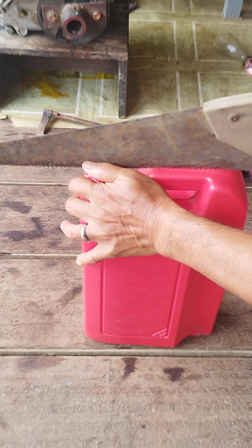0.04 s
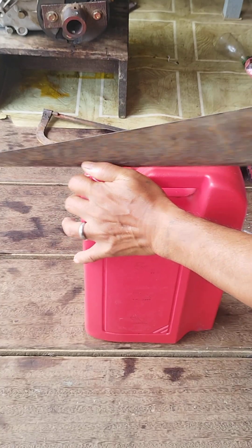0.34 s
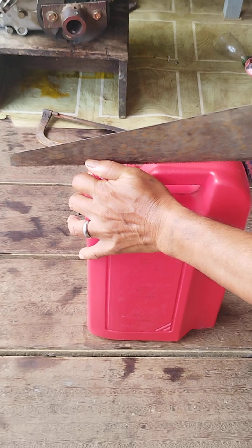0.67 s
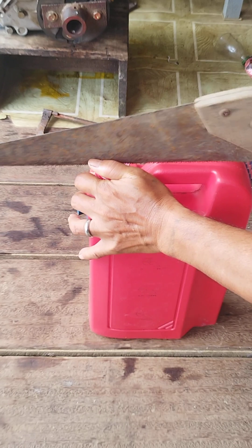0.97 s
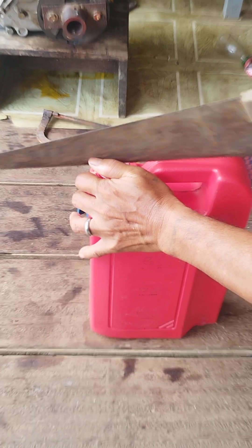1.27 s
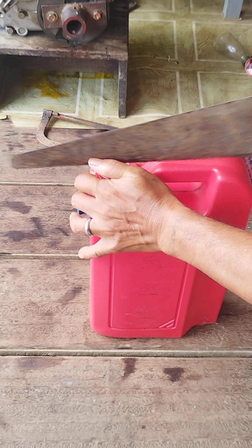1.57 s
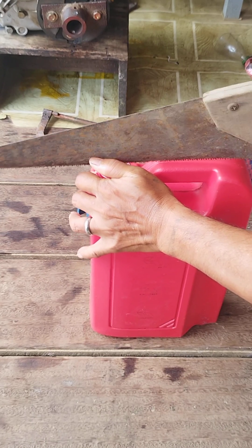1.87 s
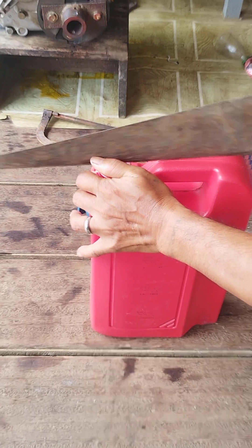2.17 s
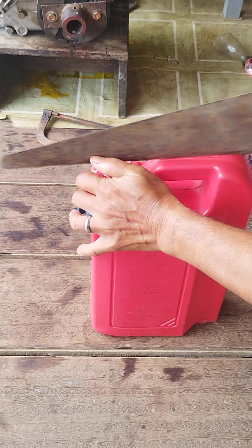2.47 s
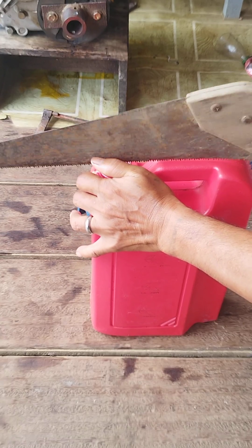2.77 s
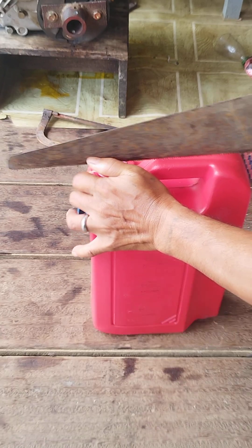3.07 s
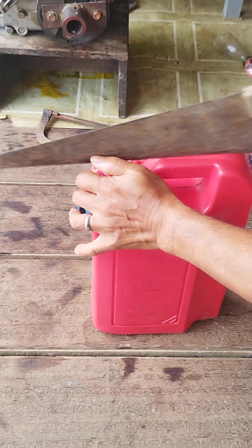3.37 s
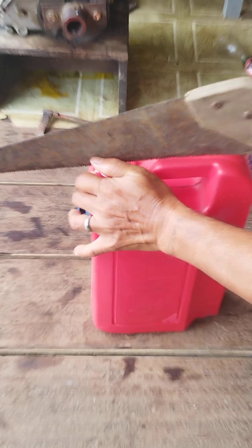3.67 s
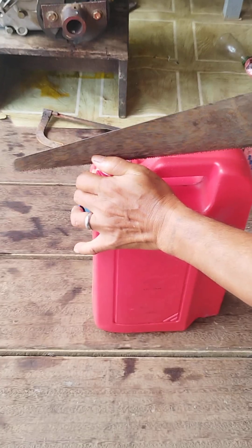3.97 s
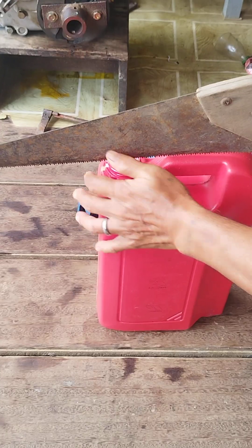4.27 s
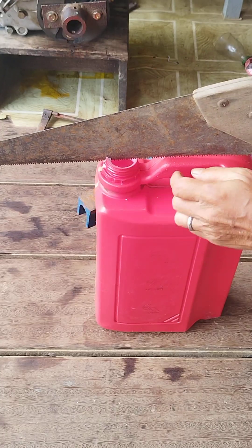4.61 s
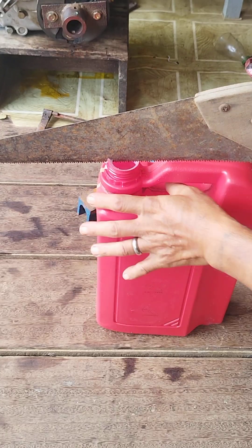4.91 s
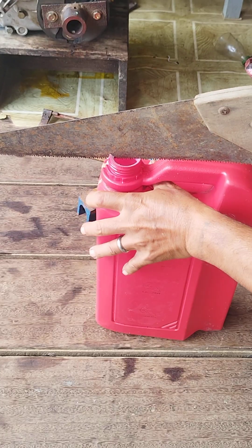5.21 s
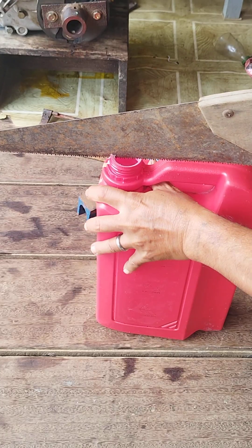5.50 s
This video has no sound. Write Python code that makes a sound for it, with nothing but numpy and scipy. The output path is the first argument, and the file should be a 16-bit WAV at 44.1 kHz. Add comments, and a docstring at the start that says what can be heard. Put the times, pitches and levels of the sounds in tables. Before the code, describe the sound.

Close by in a small, fairly dry room, a hand saw works rapidly through a plastic container, four or five strokes a second. The gritty rasp and steel hiss ride on the hollow drumming of the container, with scattered knocks as the teeth snag. The saw stops after a sharper snag, leaving a faint low hum. A hand then brushes and lightly pats the container.

```python
"""A hand saw cuts into the top of a hollow plastic can on a wooden bench, in nineteen quick strokes.
Each tooth is an impact that drives the can's walls into resonance; tearing chips excite the stiffer
plastic at the cut and make the steel blade hiss, while the air in the can booms and the bench rumbles.
The saw stops, a hand pats the can, and a low hum and a faint high shimmer remain."""
import sys
import numpy as np
from scipy import signal
from scipy.fft import rfft, irfft
from scipy.io import wavfile
from scipy.ndimage import uniform_filter1d, minimum_filter1d

SR = 44100
rng = np.random.default_rng(int(sys.argv[2]) if len(sys.argv) > 2 else 0)


def digitize_waveform(pressure):
    """Quantize a signal to 16-bit integers and store it at the path in sys.argv[1].

    Rows of a 2-D input are taken as channels; values are limited to [-1, 1].
    """
    field = np.atleast_2d(pressure).T
    bounded = np.clip(field, -1, 1)
    quanta = np.round(bounded * 32767).astype(np.int16)
    wavfile.write(sys.argv[1], SR, quanta)


N = 249165
TIME = np.arange(N) / SR
RING_TIME = np.arange(SR // 3) / SR
STOP_S, STOP_DB_PER_S = 4.29, 93  # the saw comes to rest and its sound decays

# Push and pull in turn. Each row: start, attack and time until slackening in seconds; relative levels
# of wall drumming, rasp, blade hiss and cavity boom in dB; peak tooth rate in Hz.
STROKES = [(-0.043, 0.033, 0.05, -12.0, -23, -36, 1, 291.5),
           (0.158, 0.05, 0.076, -9, -21.5, -33.5, -3.0, 345.8),
           (0.391, 0.035, 0.064, -13, -26.5, -40, -1.5, 275.6),
           (0.59, 0.025, 0.11, -13.5, -30.5, -47, -2, 286.5),
           (0.843, 0.032, 0.055, -11, -21.5, -35.5, 7, 329),
           (1.052, 0.02, 0.095, -12.5, -28, -43.5, -5.5, 295.4),
           (1.289, 0.039, 0.085, -12, -22.5, -35.5, -1, 324.6),
           (1.494, 0.02, 0.13, -16.0, -29.5, -43.0, -0.5, 295.1),
           (1.759, 0.016, 0.063, -14.5, -25.5, -36.5, -2, 298.6),
           (1.956, 0.022, 0.12, -18, -30.5, -43.0, -1.5, 293.9),
           (2.212, 0.018, 0.082, -16.5, -27, -38.5, -0.5, 295.5),
           (2.426, 0.063, 0.12, -14, -25.5, -39.5, -2.5, 279.8),
           (2.668, 0.0087, 0.093, -22.5, -30, -39.0, 5.0, 289.3),
           (2.882, 0.12, 0.11, -6.5, -21.5, -34.5, -0.5, 298.6),
           (3.135, 0.023, 0.073, -15, -23.5, -37, 5, 291.2),
           (3.352, 0.033, 0.11, -12.0, -25, -38, -2, 307.9),
           (3.606, 0.015, 0.079, -17.5, -26, -38.0, 4.5, 308.4),
           (3.816, 0.024, 0.11, -14, -25.5, -38.5, -1.5, 284.3),
           (4.057, 0.012, 0.072, -18, -25, -36.5, 4.5, 304.2)]
# Resonant modes. Each row: frequency in Hz, bandwidth in Hz, relative level in dB.
WALL_MODES = [(237.7, 4.9, 3), (266.6, 52, -2), (295, 5.8, -2), (329, 6.9, -4), (355.3, 9.9, -4),
              (406.3, 9, -10.5), (454.5, 23, -8)]  # broad flexing of the can's walls
CUT_MODES = [(629.3, 29.5, 14.5), (650, 49, 10), (726, 48, 5.5), (783, 87, 3), (829.6, 17, 11),
             (847, 20, 6.5), (993, 48, 2), (1084, 7.3, -5.5), (1117, 64, 10.5), (1185, 116, -1),
             (1304, 22, 5), (1332, 36, 5.5), (1374, 15, 2.5), (1572, 23, 1), (1638, 13, 8), (1750, 9.3, -1),
             (1930, 18, -36), (2120, 20, 3.5), (2360, 61, -45), (2450, 17, 0.5), (2920, 290, -25)]  # stiffer plastic around the cut
CAVITY_MODES = [(120, 29, -14.5), (143, 33, -13), (158.7, 20, 4.5)]  # the air in the can
BENCH_MODES = [(74, 18, 0)]  # the bench top
PATTED_MODES = [(337, 8.8, -7.5), (372, 14, -9.5), (430, 16, -11.5), (580, 25, -27), (620, 18, -4.5),
                (1130, 170, -38)]  # the can under a flat hand
# Steel teeth in the cut. Each row: frequency in Hz, relative spectral density in dB.
BLADE_SPECTRUM = [(500, -46), (1500, 13.5), (2600, 1.5), (3400, -3), (4200, -1.5), (5600, -4), (6600, -2.5),
                  (7400, 3.5), (8100, 0), (9300, -3.5), (10700, -2.5), (12000, -8.5), (14000, -13.5),
                  (15700, -22.5)]
# The blade's stereo balance. Each row: frequency in Hz, left minus right in dB.
BLADE_BALANCE = [(2500, 0.5), (4200, -1.5), (6000, -1), (7200, -2.5), (8500, -1.5), (10500, 13),
                 (14000, 2.5)]
# The teeth grab and the wall bucks. Each row: start in seconds, gain on the drumming in dB.
GRABS = [(0.429, 7), (.630, 0), (0.879, 4.5), (1.548, 4), (2.050, 6), (2.545, 3.5), (2.696, 13.5),
         (3.161, 6), (3.257, 8), (3.640, 7), (3.942, 4)]
# A tooth snaps free. Each row: start in seconds, blade click in dB, plastic knock in dB.
SNAGS = [(0.401, -27, -21), (.609, -27, -17.5), (0.847, -30, -38), (.959, -21.5, -26), (1.064, -25, -11.5),
         (1.310, -45, -22), (1.443, -24, -16.5), (1.771, -41, -45), (1.984, -33, -14), (2.187, -26, -29),
         (2.233, -20, -19), (2.439, -48, -24), (2.506, -28, -15.5), (2.678, -33, -40), (2.743, -40, -35),
         (2.773, -27, -38), (3.088, -45, -23), (3.14, -39, -18), (3.183, -26, -10), (3.4, -17.5, -9),
         (3.428, -21, -15), (3.62, -22, -28), (3.825, -28, -21), (4.071, -38, -39), (4.080, -9.5, -9),
         (4.094, -22, -8), (4.368, -27.5, -26.5)]
# The blade squeaks as it turns. Each row: start in seconds, length in seconds, pitch in Hz, level in dB.
SQUEAKS = [(1.714, 0.05, 3110, -50), (3.074, .04, 994, -36.5)]
# The bench's rumble. Each row: time in seconds, level in dB.
BENCH_LEVELS = [(0, -42), (1, -42.5), (2.2, -47), (3.1, -42.5), (3.7, -39.5), (4.2, -41), (4.55, -56)]
# The hand lands on the can. Each row: start in seconds, peak level in dB.
PATS = [(4.951, -31), (4.970, -23), (5.027, -36)]
# Fingers on plastic. Each row: start in seconds, length in seconds, dull rub in dB, dry hiss in dB.
BRUSHES = [(4.765, 0.06, -56.5, -56), (4.881, .06, -63, -57.5), (4.935, 0.13, -49.5, -70),
           (5.078, 0.047, -54, -76)]
# Background noises. Each row: frequency in Hz, relative spectral density in dB.
AIR_SPECTRUM = [(13, -36), (22, 8), (56, -12), (80, -32), (121, 3), (177, -7), (382, -16.5), (516, -20),
                (608, -23), (3430, -33.5), (5320, -37), (5770, -42), (6270, -50), (10300, -42),
                (15500, -56)]
SHIMMER_SPECTRUM = [(4500, -37), (5900, 9), (6400, 7), (7600, 11.5), (8200, 5), (9200, -8)]
# Hum tones. Each row: frequency in Hz, level in dB.
HUM_TONES = [(49, -53), (113, -48), (231, -63)]
# The shimmer's swell. Each row: time in seconds, level in dB.
SHIMMER_LEVELS = [(0, -77), (4.85, -65), (5, -61), (5.65, -62.5)]
# An insect-like tone that sags twice. Each row: time in seconds, pitch in Hz.
TRILL_PITCH = [(4.3, 5880), (4.85, 5654), (4.95, 6120), (5.65, 5550)]
# A faint whistle. Each row: time in seconds, pitch in Hz, level in dB.
WHISTLE = [(4.541, 9220, -83), (4.58, 9820, -79), (4.615, 10860, -70), (4.69, 9700, -76),
           (4.76, 10000, -80), (4.83, 10500, -73), (4.9, 9600, -84)]
# Likeness of left and right. Each row: frequency in Hz, correlation from 0 to 1.
COHERENCE = [(30, 0.16), (110, 1), (250, 0.82), (700, 0.3), (1500, 0.057), (5000, 0.51), (15000, 0.099)]


def saw():
    """Forced vibration: tooth impacts and torn chips drive the walls, the cut, the blade and the cavity."""
    drum_db, rasp_db, hiss_db = np.transpose(STROKES)[3:6]
    drum = stroke_envelope(drum_db, attack_scale=1.96, release_s=0.072, turn_db=-39)
    rasp = stroke_envelope(rasp_db, attack_scale=1.06, release_s=0.071, turn_db=-50.5)
    hiss = stroke_envelope(hiss_db, attack_scale=0.86, release_s=0.067, turn_db=-60)
    blows, tearing = teeth(arch=.33, jitter=.07, uneven_db=5.0, bite=0.53)
    chips = tearing * np.array([fractures(per_s=2500, spread_db=1.5) for _ in range(2)])
    cracks = fractures(per_s=56, spread_db=2.0)  # now and then a large chip breaks off
    grab = grab_gain()
    return (amp(0.53) * drum * grab * wall_drumming(blows, chips)
            + amp(0.65) * rasp * grab ** 0.42 * cut_rasp(blows, chips, cracks, rasp)
            + amp(4.5) * hiss * blade_hiss(tearing, cracks)
            + amp(-30.5) * cavity_boom(drum * rasp))


def teeth(arch, jitter, uneven_db, bite):
    """An impulse train whose rate follows blade speed: one blow a tooth, then a short spell of tearing."""
    starts, *_, peak_hz = np.transpose(STROKES)
    stroke = np.interp(TIME, np.append(starts, STOP_S), np.arange(len(starts) + 1))
    rate_hz = np.append(peak_hz, 0)[stroke.astype(int)] * abs(np.sin(np.pi * stroke)) ** arch
    unsteadiness = np.maximum(1 + jitter * wander(90), .1)
    teeth_passed = np.cumsum(np.maximum(rate_hz, 60) * unsteadiness) / SR
    tooth = teeth_passed.astype(int)
    depth = amp(uneven_db * np.clip(rng.standard_normal(N), -2, 2))[tooth]
    blows = depth * np.diff(tooth, prepend=0)
    tearing = depth * (0.35 + np.exp(-(teeth_passed % 1) / bite))
    return unit_rms(blows), unit_rms(tearing)


def fractures(per_s, spread_db):
    """Shot noise: tiny fractures of uneven size occur at random instants."""
    size = amp(spread_db * np.minimum(rng.exponential(1, N), 4)) * rng.choice([-1, 1], N)
    return unit_rms(size * (rng.random(N) < per_s / SR))


def stroke_envelope(levels_db, attack_scale, release_s, turn_db):
    """Powers add: each stroke bites, holds and slackens above the light drag of the turning blade."""
    power = amp(turn_db) ** 2
    for (start, attack_s, hold_s, *_), db in zip(STROKES, levels_db):
        age = np.maximum(TIME - start, 0)
        rise = 1 - np.exp(-age / (attack_s * attack_scale))
        fall = np.exp(-(np.maximum(age - hold_s, 0) / release_s) ** 2)
        power = power + (amp(db) * rise * fall) ** 2
    return np.sqrt(power) * amp(-STOP_DB_PER_S * np.maximum(TIME - STOP_S, 0))


def grab_gain(rise_s=0.0019, hold_s=0.028):
    """Transient loading: grabbing teeth raise the vibration at once and soon let go."""
    gain_db = 0
    for start, db in GRABS:
        age = np.maximum(TIME - start, 0)
        gain_db = gain_db + db * (1 - np.exp(-age / rise_s)) * np.exp(-(age / hold_s) ** 4)
    return amp(gain_db)


def wall_drumming(blows, chips):
    """Resonance: the walls respond to blows and chips in their low flexing modes."""
    flexing = convolve(blows + 0.98 * chips[0], modal_ring(WALL_MODES, spread=0.013))
    return steadied(band(flexing, 215.5, 412), 0.052)


def cut_rasp(blows, chips, cracks, envelope):
    """Modal excitation at the cut: a harder stroke tears more sharply and favours the higher modes."""
    force = .5 * blows + chips + 0.91 * chips[::-1] + 0.32 * cracks  # both sides reach each channel
    drive = sliding_blade(force, t60=0.14, wet=0.47, shift_hz=17)
    plastic = band(convolve(drive, modal_ring(CUT_MODES, spread=.2)), 590, 3000)
    treble = signal.sosfiltfilt(signal.butter(2, 1000, "high", fs=SR, output="sos"), plastic)
    treble_gain = (envelope / amp(-12)) ** 0.23
    return steadied(plastic + treble * (treble_gain - 1), 0.02)


def blade_hiss(tearing, cracks):
    """Broadband excitation: fine fractures ring the dense high modes of the steel."""
    grit = tearing * np.array([fractures(per_s=5000, spread_db=3.5) for _ in range(2)])
    steel = coloured(steadied(grit, 0.012) + 0.42 * cracks, BLADE_SPECTRUM, BLADE_BALANCE)
    return unit_rms(sliding_blade(steel, t60=0.099, wet=1.73, shift_hz=19))


def sliding_blade(drive, t60, wet, shift_hz, count=9):
    """A moving boundary: as the blade's free length changes, one set of modes fades into the next."""
    place, out = TIME * shift_hz + 0.27 * wander(5.1), 0
    for k in range(count):
        distance = abs((place - k + count / 2) % count - count / 2)
        share = np.cos(np.pi / 2 * np.minimum(distance, 1))
        out = out + convolve(drive * share, reflections(t60, wet))
    return out


def cavity_boom(effort):
    """Cavity resonance: the air in the can swings more strongly as the sawing grows harder."""
    starts, _, holds, *_, boom_db, _ = np.transpose(STROKES)
    envelope = amp(np.interp(TIME, starts + holds, boom_db)) * effort ** 0.39
    air = convolve(fractures(per_s=1000, spread_db=3.5), modal_ring(CAVITY_MODES))
    return unit_rms(envelope * steadied(band(air, 107.8, 170), 0.2))


def snags(click_t60=0.029):
    """Free vibration after release: a caught tooth lets go, the blade clicks and the plastic knocks."""
    out = np.zeros((2, N))
    knock = band(modal_ring(CUT_MODES, spread=0.14), 710, 2000)
    knock += 1.65 * band(modal_ring(WALL_MODES), 117, 384)
    for start, click_db, knock_db in SNAGS:
        click = coloured(rng.standard_normal((2, len(RING_TIME))), BLADE_SPECTRUM, BLADE_BALANCE)
        click *= np.exp(-np.log(1000) * RING_TIME / click_t60)
        add(out, start, amp(click_db) * click / abs(click).max() + amp(knock_db) * knock)
    return out


def squeaks():
    """Stick-slip friction: the slow blade catches and slides in the cut."""
    return sum(amp(db) * fluttering_tone(hz, flutter=0.0296) * swell(start, length)
               for start, length, hz, db in SQUEAKS)


def bench():
    """Structure-borne sound: the sawing keeps one low mode of the bench top rumbling."""
    rumble = band(convolve(rng.standard_normal(N), modal_ring(BENCH_MODES)), 55, 88)
    return amp(contour(BENCH_LEVELS)) * steadied(rumble, 0.26)


def hand():
    """Soft impact and friction: the palm excites the can's low modes and the fingers brush it."""
    out = np.zeros((2, N))
    pat = band(modal_ring(PATTED_MODES, spread=0.11), 263, 464)
    for start, db in PATS:
        add(out, start, amp(db) * pat / abs(pat).max())
    plastic = convolve(rng.standard_normal(N), modal_ring(CUT_MODES, spread=0.18))
    rub = unit_rms(band(plastic, 426, 4500))
    hiss = unit_rms(band(rng.standard_normal((2, N)), 1450, 13000))
    for start, length, rub_db, hiss_db in BRUSHES:
        out += (amp(rub_db) * rub + amp(hiss_db) * hiss) * swell(start, length)
    return out


def background(air_db=-45.5, trill_db=-74):
    """The noise floor: still air, a wavering hum, an insect-like shimmer and trill, a faint whistle."""
    air = amp(air_db) * unit_rms(coloured(rng.standard_normal((2, N)), AIR_SPECTRUM))
    hum = 0
    for hz, db in HUM_TONES:
        waver = 1 + 0.087 * wander(1.5)
        hum = hum + amp(db) * unit_rms(waver * np.sin(2 * np.pi * hz * TIME + .5 * wander(6.4)))
    shimmer = unit_rms(coloured(rng.standard_normal((2, N)), SHIMMER_SPECTRUM))
    shimmer *= amp(contour(SHIMMER_LEVELS))
    trill = amp(trill_db) * fluttering_tone(contour(TRILL_PITCH), flutter=.016)
    times, hz, db = np.transpose(WHISTLE)
    whistle = fluttering_tone(np.interp(TIME, times, hz), flutter=0.0203)
    whistle *= np.interp(TIME, times, amp(db), left=0, right=0)
    return air + hum + shimmer * (1 + 0.11 * wander(60)) + trill + whistle


def modal_ring(modes, spread=0.):
    """Modal superposition: damped cosines, each with a left-right phase difference set by spread."""
    out = 0
    for k, (hz, width, db) in enumerate(modes):
        phase = (-1) ** k * spread * np.sqrt(hz / modes[0][0]) * np.array([[1], [-1]])
        decay = np.exp(-np.pi * width * RING_TIME)
        out = out + amp(db) * width * decay * np.cos(2 * np.pi * hz * RING_TIME + phase)
    return out / abs(out).max()


def reflections(t60, wet):
    """Reverberation: a direct path and a diffuse stereo tail that falls 60 dB in t60 seconds."""
    response = rng.standard_normal((2, len(RING_TIME))) * np.exp(-np.log(1000) * RING_TIME / t60)
    response *= wet / np.linalg.norm(response, axis=1, keepdims=True)
    response[:, 0] += 1
    return response / np.sqrt(1 + wet ** 2)


def coloured(pair, spectrum, balance=((1, 0), (2, 0))):
    """Partial coherence: two signals are blended, then given a spectrum and a stereo balance."""
    hz = np.fft.rfftfreq(pair.shape[1], 1 / SR)
    left, other = rfft(pair)
    likeness = np.clip(at_frequency(COHERENCE, hz), 0, 1)
    right = likeness * left + np.sqrt(1 - likeness ** 2) * other
    gain_db = at_frequency(spectrum, hz) + np.outer([.5, -.5], at_frequency(balance, hz))
    return irfft(np.array([left, right]) * amp(gain_db), pair.shape[1])


def fluttering_tone(hz, flutter):
    """Random frequency modulation broadens a tone of rms 1."""
    return unit_rms(np.sin(2 * np.pi * np.cumsum(hz * (1 + flutter * wander(510))) / SR))


def wander(hz):
    """Low-pass noise of rms 1, fluctuating up to about the given rate."""
    f = np.fft.rfftfreq(N, 1 / SR)
    return unit_rms(irfft(rfft(rng.standard_normal(N)) * np.exp(-(f / hz) ** 2), N))


def convolve(drive, response):
    """Convolution gives a linear system's stereo response to a drive."""
    return signal.fftconvolve(np.atleast_2d(drive), response, axes=1)[:, :N]


def band(x, low_hz, high_hz):
    """Band-pass filtering."""
    return signal.sosfilt(signal.butter(3, [low_hz, high_hz], "band", fs=SR, output="sos"), x)


def steadied(x, seconds):
    """Normalisation to rms 1 over a sliding window."""
    window = np.hanning(int(seconds * SR))
    power = signal.fftconvolve((x ** 2).mean(0), window / window.sum(), "same")
    return x / np.sqrt(abs(power) + 1e-9 * power.mean())


def unit_rms(x):
    """Normalisation to rms 1."""
    return x / np.sqrt(np.mean(x ** 2) + 1e-20)


def amp(db):
    """Decibels as an amplitude ratio."""
    return 10 ** (np.asarray(db) / 20)


def at_frequency(points, hz):
    """Interpolation on a log-frequency axis."""
    f, value = np.transpose(points)
    return np.interp(np.log(hz + 1), np.log(f + 1), value)


def contour(points):
    """Linear interpolation in time."""
    return np.interp(TIME, *np.transpose(points))


def swell(start_s, length_s):
    """A half-sine envelope."""
    return np.sin(np.pi * np.clip((TIME - start_s) / length_s, 0, 1))


def add(mix, start_s, sound):
    """Superposition of a sound on the mix."""
    part = mix[..., round(start_s * SR):][..., :sound.shape[-1]]
    part += sound[..., :part.shape[-1]]


def scene():
    """Propagation: the work sounds in a small, fairly dry room and arrives slightly earlier on the left."""
    work = saw() + squeaks() + bench() + snags() + hand()
    left, right = convolve(work, reflections(t60=0.54, wet=0.16))
    return np.array([left, np.roll(right, 5)]) + background()


def record(dry):
    """Peak limiting holds the loudest moments; a low-pass filter then bounds the bandwidth."""
    ceiling, cutoff_hz = .56, 15750
    gain = np.minimum(1, ceiling / (abs(dry).max(0) + 1e-9))
    limited = dry * uniform_filter1d(minimum_filter1d(gain, size=400), size=300)
    low_pass = signal.firwin(511, cutoff_hz, window=("kaiser", 9), fs=SR)
    return signal.oaconvolve(limited, low_pass[None], "same")


dry = scene()
out = record(dry)
digitize_waveform(out)
```